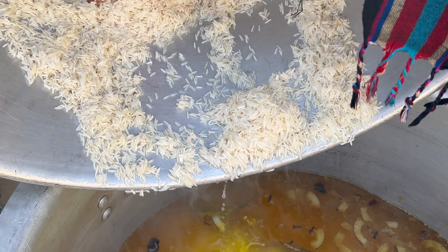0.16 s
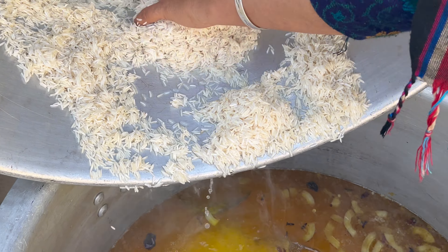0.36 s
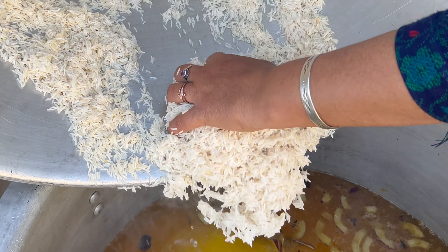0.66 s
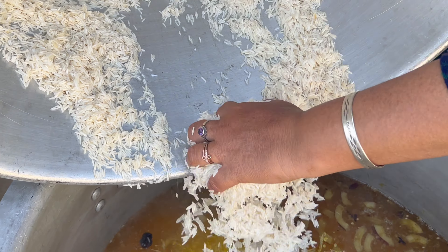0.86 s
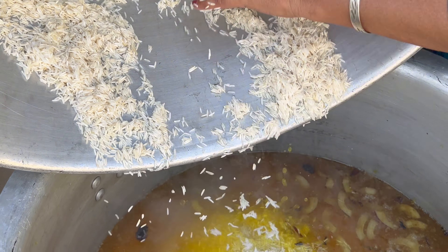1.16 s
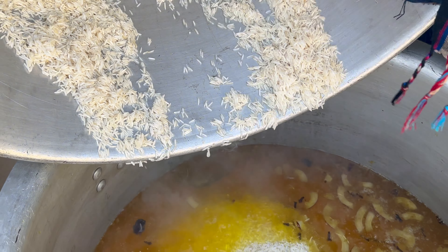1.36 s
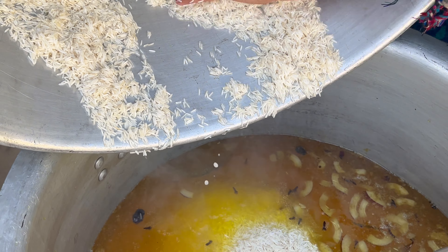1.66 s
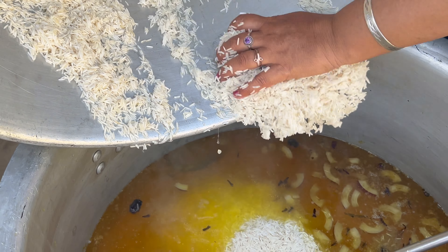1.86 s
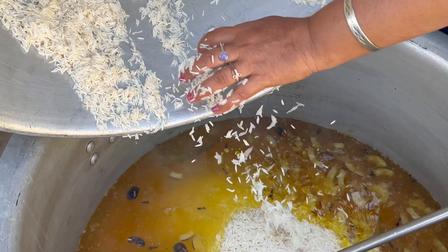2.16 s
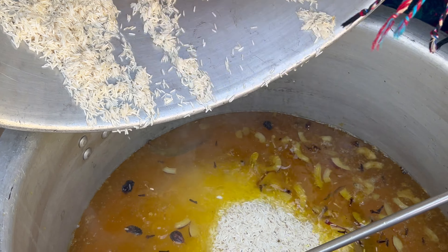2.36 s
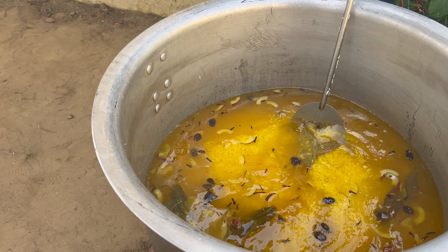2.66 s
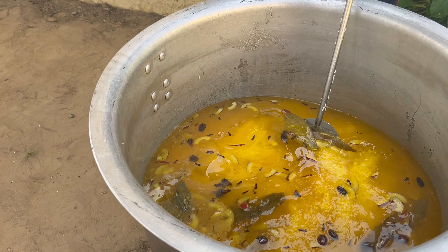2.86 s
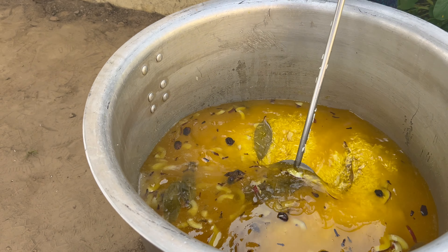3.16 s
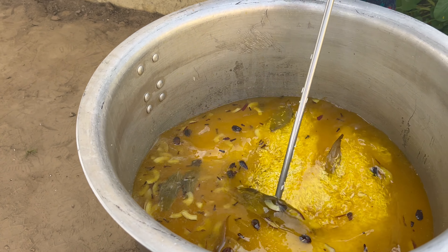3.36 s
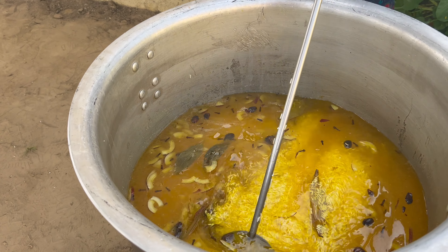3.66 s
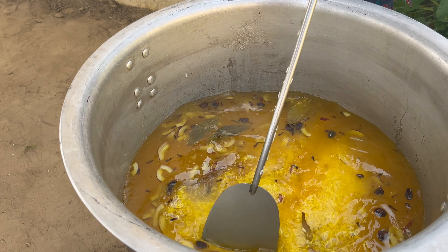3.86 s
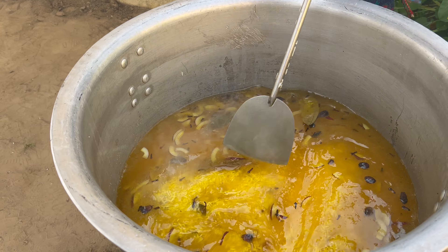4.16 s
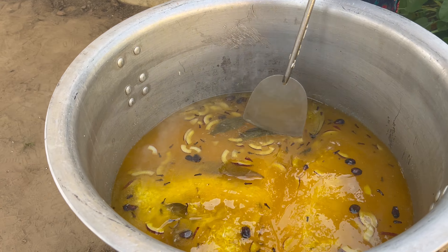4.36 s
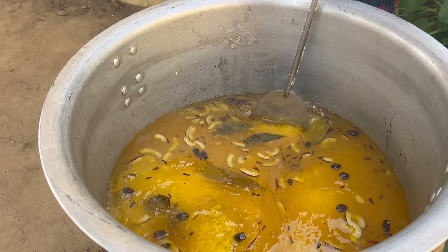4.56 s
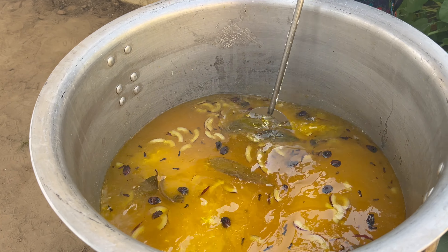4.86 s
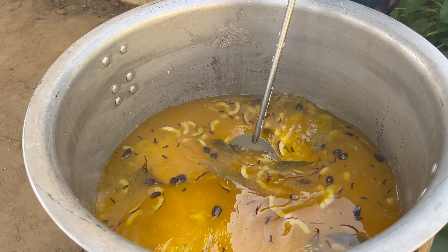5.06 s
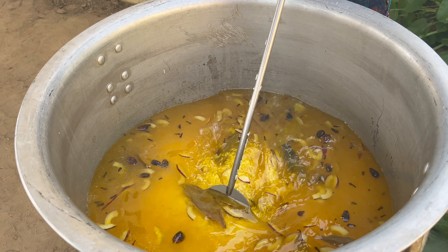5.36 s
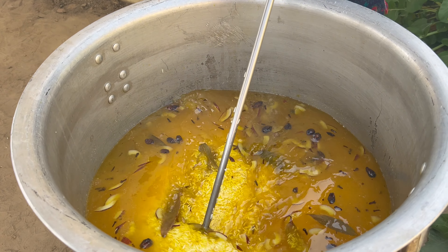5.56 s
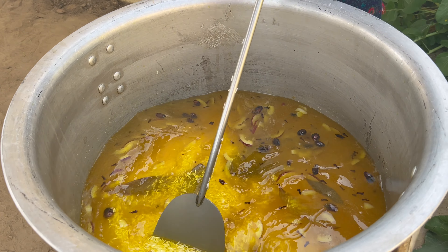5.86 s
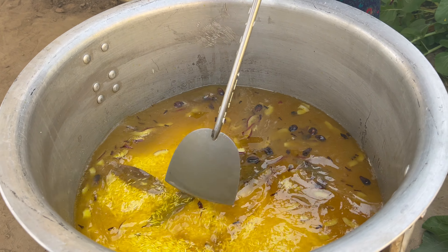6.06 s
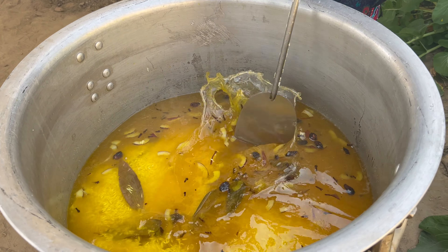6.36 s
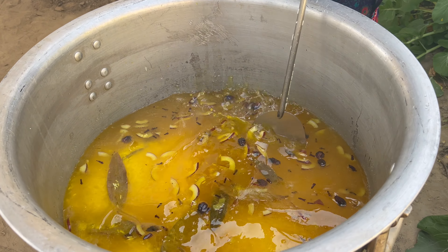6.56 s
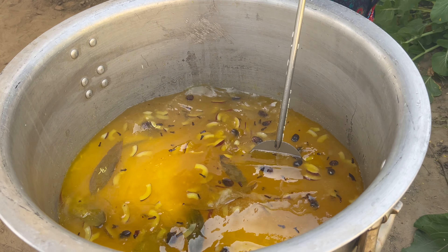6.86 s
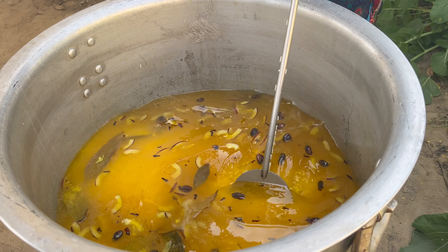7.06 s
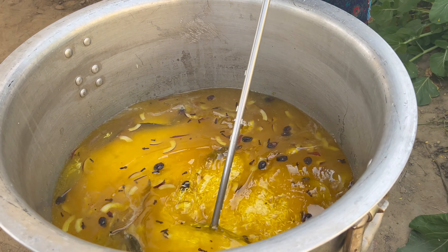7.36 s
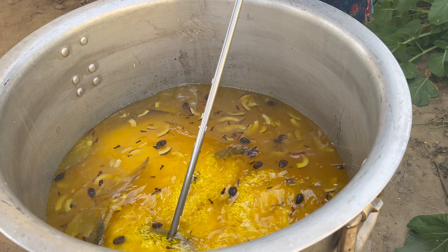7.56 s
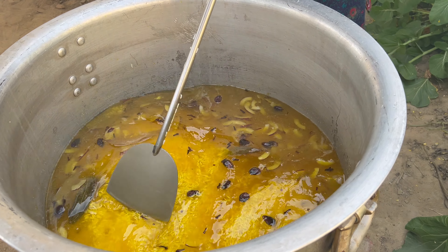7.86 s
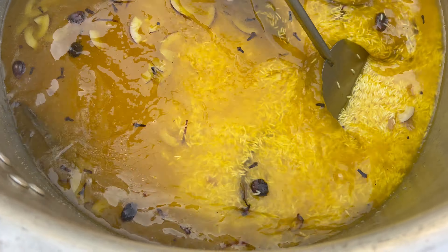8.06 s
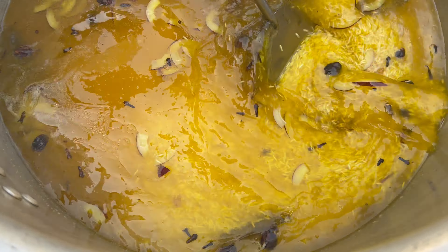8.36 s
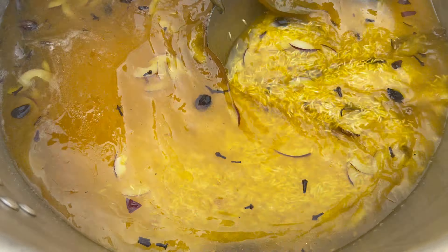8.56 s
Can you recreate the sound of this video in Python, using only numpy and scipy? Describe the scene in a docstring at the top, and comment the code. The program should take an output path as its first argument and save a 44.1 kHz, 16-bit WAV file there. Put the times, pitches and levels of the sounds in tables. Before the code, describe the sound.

Dry grains hiss over metal and fall in crisp showers into a pot of water, with quick bird whistles and wind bumps. Abruptly the pouring and birds stop. A steel ladle strikes the pot bottom with a hollow clank, crunches and scrapes wet rice, makes the pot ring, then lifts out dripping. The stroke repeats about every two seconds, and a final closer one is cut off mid-stir. Close stereo microphone, open air.

```python
"""Rice patters into a pot of hot water first, swept off a big metal tray by hand, outdoors, with bird whistles
and wind on the microphone: grains are clicks in noise, the tray a set of modes, birds gliding sines.
Then a long steel ladle stirs: it strikes the pot floor as noise bursts, grinds over it through the rice as noise
ringing in the pot, and drips as short bubble tones. The outdoor air steps in level twice, and the pouring stops
at the first step. The microphone's two ports shift the treble between the ears."""
import sys
import numpy as np
from scipy import signal
from scipy.fft import rfft, irfft, next_fast_len
from scipy.io import wavfile
from scipy.ndimage import uniform_filter1d

SR = 44100
rng = np.random.default_rng(int(sys.argv[2]) if len(sys.argv) > 2 else 0)


def generate_wav(sig):
    """Save sig (samples, or channels by samples) to the path in sys.argv[1] as 16-bit PCM at SR."""
    pcm = np.round(np.clip(np.atleast_2d(sig).T, -1, 1) * 32767).astype(np.int16)
    wavfile.write(sys.argv[1], SR, pcm)


N = 383669


def amp(db):
    """dB to gain."""
    return np.exp(np.asarray(db) * (np.log(10) / 20))


def unit(x):
    """Scale to rms 1."""
    return x / np.sqrt(np.mean(x ** 2) + 1e-20)


def in_time(rows):
    """Columns per sample, and a gate that is open between the first and last row."""
    s, *columns = np.transpose(rows)
    t = np.arange(N) / SR
    return [np.interp(t, s, c) for c in columns] + [(t >= s[0]) & (t <= s[-1])]


def in_strokes(strokes):
    """Columns per sample over all strokes, and a gate that is open during each stroke."""
    *columns, _ = in_time([row for stroke in strokes for row in stroke])
    gate = sum(in_time(stroke)[-1] for stroke in strokes)
    return columns + [gate * 1.]


def swells(s, hold_s, db, rise, fall, rest_db):
    """Level in dB: each event rises, holds and falls in straight lines (dB per s) above a resting level."""
    t = np.arange(0, N, 32)[:, None] / SR
    level = db - rise * np.maximum(s - t, 0) - fall * np.maximum(t - s - hold_s, 0)
    return np.interp(np.arange(N) / SR, t[:, 0], np.maximum(level.max(axis=1), rest_db))


def drift(rate):
    """Slow chance with spread 1: white noise through two poles at rate Hz, drawn at every 40th sample."""
    r = np.exp(-80 * np.pi * rate / SR)
    slow = signal.lfilter([1], [1, -2 * r, r * r], rng.standard_normal(N // 40 + 2002))[2000:]
    return np.interp(np.arange(N) / 40, np.arange(len(slow)), unit(slow))


def at_hz(points, hz):
    """Read a spectrum on a log frequency axis."""
    point_hz, values = np.transpose(points)
    return np.interp(np.log(hz), np.log(point_hz), values)


def band(x, low_hz, high_hz):
    """Butterworth band-pass."""
    return signal.sosfilt(signal.butter(2, [low_hz, high_hz], "band", fs=SR, output="sos"), x)


def resonate(x, hz, width_hz):
    """Two-pole resonance, gain 1 on top."""
    r = np.exp(-np.pi * width_hz / SR)
    poles = [1, -2 * r * np.cos(2 * np.pi * hz / SR), r * r]
    return signal.lfilter(np.array([1, 0, -1]) * (1 - r * r) / 2, poles, x)


def stereo(mid, side, alike):
    """Left and right with a given likeness (correlation)."""
    alike = np.clip(alike, -1, 1)
    return np.sqrt(1 + alike) * mid + np.sqrt(1 - alike) * side * [[1], [-1]]


def add(out, s, piece, pan_db=0):
    """Mix a short sound in at time s; a positive pan is louder on the left."""
    i = round(s * SR)
    piece = (piece * amp([[pan_db / 2], [-pan_db / 2]]))[:, :N - i]
    out[:, i:i + piece.shape[1]] += piece


def grains(per_s, spread_db, share):
    """Two mid-side pairs of white sources: noise with a power share of uneven clicks."""
    shape = (2, 2, N)
    sizes = amp(spread_db * np.minimum(rng.exponential(1, shape), 4))
    clicks = (rng.random(shape) < per_s / SR) * sizes * rng.choice([-1, 1], shape)
    share = np.clip(share, 0, 1)
    return np.sqrt(1 - share) * rng.standard_normal(shape) + np.sqrt(share) * unit(clicks)


def coloured(white, spectrum, alike, patchy_db, tilt_db=None):
    """Half-octave bands, each with its level, flicker and likeness; tilt_db(hz) moves bands; rms 1 before tilt."""
    bands, together = [], drift(12.8)
    edges = 15700 * 2 ** -np.arange(0, np.log2(15700 / spectrum[0][0]), .5)[::-1]
    centres = np.sqrt(edges[1:] * edges[:-1])
    for k, hz in enumerate(centres):
        mid, side = band(white[k % 2], edges[k], edges[k + 1])   # neighbouring bands take different sources
        flicker_db = patchy_db * (1.19 * together + drift(18))
        bands.append(amp(at_hz(spectrum, hz) + flicker_db) * stereo(mid, side, at_hz(alike, hz)))
    scale = np.sqrt(np.mean(sum(bands) ** 2))
    return sum(b * amp(tilt_db(hz) if tilt_db else 0) for b, hz in zip(bands, centres)) / scale


def body(x, modes, direct_db, wander_db):
    """Modes in parallel beside the direct sound; each swells and fades as the contact point moves."""
    out = amp(direct_db) * x
    for k, (hz, width_hz, db) in enumerate(modes):
        out = out + (-1) ** k * resonate(amp(db + wander_db * drift(6)) * x, hz, width_hz)
    return out


def gliding(x, hz, width_hz):
    """A resonance whose centre moves and wobbles: low noise riding on a gliding carrier, rms 1."""
    slow = signal.sosfilt(signal.butter(2, width_hz / 2, fs=SR, output="sos"), x)
    wobble = 1 + .025 * drift(8)
    phase = 2 * np.pi * np.cumsum(hz * wobble) / SR
    flicker = amp(4 * drift(10))
    return unit((slow[0] * np.cos(phase) + slow[1] * np.sin(phase)) * flicker)


def gurgle(per_s, low_hz, high_hz, sharpness):
    """Bubbles at random moments and sixteen pitches, swelling softly and ringing some cycles; rms 1."""
    born = (rng.random(N) < per_s / SR) * amp(2.3 * np.minimum(rng.exponential(1, N), 3))
    dealt, pans_db = rng.integers(0, 16, N), rng.normal(0, 3, 16)
    out = 0
    for k, hz in enumerate(np.geomspace(low_hz, high_hz, 16)):
        struck = born * (dealt == k) + 1e-18
        ring = resonate(resonate(struck, hz, hz / sharpness), hz, hz / 5)
        out = out + ring * amp([[pans_db[k]], [-pans_db[k]]]) / hz
    return unit(out)


# The stirred water fizzes. Each row: start in seconds, hold in seconds, gain in dB.
CHURN = [(3.3, 0.25, -54), (5.015, 0.51, -60.5), (6.412, 0.93, -61), (8.209, 0.44, -55)]
CHURN_RISE_DB_PER_S, CHURN_REST_DB = 35, -68


def churn_db():
    """Level of the fizz that each stroke stirs up."""
    return swells(*np.transpose(CHURN), CHURN_RISE_DB_PER_S, fall=60, rest_db=CHURN_REST_DB)


# Outdoor air. Each row: frequency in Hz, density in dB per Hz.
AIR = [(59, -41.5), (100, -2), (140, -5.5), (177, -13.5), (589, -17), (1210, -19), (2520, -25.5),
       (7890, -36), (10200, -29), (12800, -35.5), (15500, -32.5)]
# Likeness of the ears in the open. Each row: frequency in Hz, correlation.
OPEN_ALIKE = [(60, 0.34), (240, 0.15), (950, 0.081), (3770, 0.035), (9000, 0.55), (15000, 1)]
# Moments in seconds at which the air steps in level.
AIR_STEPS_S = (2.432, 8.0)
# Gain of the air in dB before, between and after those steps.
AIR_DB = (-48.5, -65, -51.5)


def air():
    """Quiet outdoor noise; the water's murmur lifts it during a stroke and dies slowly after."""
    s, hold_s, _ = np.transpose(CHURN)
    settle_db = swells(s, hold_s, -56, CHURN_RISE_DB_PER_S, fall=7, rest_db=-120)
    air_db = np.take(AIR_DB, np.searchsorted(AIR_STEPS_S, np.arange(N) / SR))
    noise = coloured(rng.standard_normal((2, 2, N)), AIR, OPEN_ALIKE, patchy_db=1.0)
    return amp(np.maximum(air_db, settle_db)) * noise


# Gusts at the microphone. Each row: start in seconds, hold in seconds, thump gain in dB, flutter gain in dB.
GUSTS = [(0.208, 0.037, -34, -38), (0.386, 0.14, -35, -56), (0.644, 0.015, -35.5, -68),
         (0.983, 0.062, -33, -73), (1.127, 0.31, -48.5, -56.5), (2.452, 0.017, -39.5, -51.5),
         (2.698, 0.013, -39.5, -36), (2.79, 0.077, -42.5, -47), (3.12, 0.02, -49, -62),
         (3.702, 0.014, -35.5, -64), (3.783, 0.008, -43.5, -66), (4.071, 0.038, -50.5, -65),
         (4.174, 0.062, -44, -72.5), (4.272, 0.0086, -32.5, -49), (4.627, 0.013, -45, -50),
         (5.319, 0.11, -38, -34.5), (5.523, 0.017, -39, -44), (5.6, 0.034, -34.5, -47),
         (5.699, 0.0098, -33.5, -43), (6.178, 0.02, -40.5, -44), (6.32, 0.018, -35.5, -42),
         (6.926, 0.053, -44, -43), (7.151, 0.023, -59, -37.5), (8.004, 0.11, -45.5, -50),
         (8.189, 0.0081, -32, -45), (8.437, 0.15, -49, -70)]


def wind():
    """Lumpy low noise on the microphone ports: a deep thump and a flutter above it."""
    s, hold_s, thump_db, flutter_db = np.transpose(GUSTS)
    mid, side = rng.standard_normal((2, 2, N))
    thump = unit(band(band(stereo(mid[0], side[0], 0.35), 44.8, 84.3), 30, 190))
    flutter = unit(band(band(stereo(mid[1], side[1], 0.93), 68, 220), 70, 420))
    slopes = 352, 362.5   # rise and fall, dB per s
    thump_level = amp(swells(s, hold_s, thump_db, *slopes, rest_db=-59))
    flutter_level = amp(swells(s, hold_s, flutter_db, *slopes, rest_db=-69))
    return thump_level * thump + flutter_level * flutter


# Bird notes, one list a note. Each row: time in seconds, pitch in Hz, gain in dB.
BIRDS = [
    [(0.13, 2750, -48), (0.15, 3500, -48), (0.16, 3600, -49), (0.175, 3620, -52)],
    [(0.18, 3300, -52), (0.192, 2750, -48), (0.203, 2550, -48)],
    [(0.385, 3100, -53), (0.401, 3140, -41.5), (0.42, 3460, -34.5), (0.434, 3560, -42), (0.443, 4040, -23)],
    [(0.445, 3200, -50), (0.456, 2700, -47), (0.466, 2550, -48)],
    [(0.464, 4150, -48), (0.472, 3500, -39), (0.497, 3250, -36.5), (0.53, 3234, -44), (0.575, 3220, -56)],
    [(0.637, 9700, -54), (0.65, 8800, -52), (0.66, 6300, -52)],
    [(0.678, 5950, -52), (0.69, 5750, -51), (0.707, 4400, -53)],
    [(0.705, 2800, -57), (0.714, 3500, -57), (0.73, 3950, -59)],
    [(0.72, 2750, -48), (0.73, 3020, -40), (0.758, 3010, -31), (0.783, 2980, -41)],
    [(0.797, 2650, -42), (0.82, 2900, -30), (0.838, 3000, -27), (0.852, 3000, -28)],
    [(0.862, 2550, -37), (0.878, 3000, -34), (0.897, 2550, -35)],
    [(1.955, 3100, -46), (1.978, 4050, -47), (2.028, 4560, -44), (2.155, 4615, -42.5)],
    [(2.326, 5000, -52), (2.339, 8000, -48)],
    [(2.352, 5800, -48), (2.366, 8200, -50)],
    [(2.38, 6960, -46), (2.406, 7700, -48), (2.432, 7230, -53)],
]
# Echoes of each note. Each row: delay in seconds, gain in dB, left over right in dB.
BIRD_ECHOES = [(.0022, -14, -12), (.017, -16, 6)]


def birds():
    """Near-sine whistles with a weak octave and a few short echoes."""
    out = np.zeros((2, N))
    for note in BIRDS:
        s, hz, db = np.transpose(note)
        t = np.arange(s[0], s[-1], 1 / SR)
        phase = 2 * np.pi * np.cumsum(np.interp(t, s, hz)) / SR
        fade = np.clip(np.minimum(t - s[0], s[-1] - t) / .006, 0, 1)
        rough = amp(1.5 * unit(uniform_filter1d(rng.standard_normal(len(t)), size=500)))   # fast unevenness
        whistle = rough * np.sin(phase) + amp(-30) * np.sin(2 * phase)
        tone = np.sqrt(2) * fade * amp(np.interp(t, s, db)) * whistle
        add(out, s[0], tone, pan_db=6)
        for delay_s, echo_db, pan_db in BIRD_ECHOES:
            add(out, s[0] + delay_s, amp(echo_db) * tone, pan_db)
    return out


# The hand sweeps along the tray. Each row: start in seconds, hold in seconds, gain in dB.
SWEEPS = [(0.136, 0.033, -46.5), (0.27, 0.054, -41.5), (1.03, 0.014, -51), (1.632, 0.057, -46),
          (1.728, 0.13, -40), (1.935, 0.17, -46.5)]
HAND_REST_DB = -56


def sweep_db():
    """Level of the hand's rubbing."""
    return swells(*np.transpose(SWEEPS), rise=101, fall=134, rest_db=HAND_REST_DB)


# Rice rubbed along metal. Each row: frequency in Hz, density in dB per Hz.
RUB = [(88, -17), (150, -2), (240, -16), (413, -4), (530, -2.5), (1170, -1), (1840, -2), (2580, -2.5),
       (5000, -16.5), (6500, -25), (11000, -120)]
# Modes of the tray. Each row: frequency in Hz, width in Hz, gain in dB.
TRAY = [(436, 46, 1.5), (705, 150, -1.5), (1190, 100, 1.5), (2010, 40, -3), (2530, 170, -1.5)]


def rub():
    """The hand rubs rice along the tray: grainy noise ringing in the metal's modes."""
    contact = coloured(grains(500, 3.5, .55), RUB, OPEN_ALIKE, patchy_db=1.2)
    return amp(sweep_db()) * body(contact, TRAY, direct_db=2.0, wander_db=3)


# The tray booms. Each row: start in seconds, hold in seconds, gain in dB.
BOOMS = [(0.214, 0.019, -26), (0.283, 0.034, -29.5), (1.637, 0.16, -37), (2.016, 0.01, -43)]


def boom():
    """The tray's boom: noise through two low resonances in series, the same in both ears."""
    boom_db = swells(*np.transpose(BOOMS), rise=716, fall=121, rest_db=-56)
    mid, side = resonate(resonate(rng.standard_normal((2, N)), 106.8, 15.7), 74.0, 27)
    return amp(boom_db) * unit(stereo(mid, side, 1.0))


# Handfuls of rice falling. Each row: start in seconds, hold in seconds, gain in dB.
SHOWERS = [(0.789, 0.29, -29.5), (1.136, 0.098, -34.5), (2.018, 0.15, -32), (2.07, 0.045, -29.5),
           (2.198, 0.098, -39.5)]
# Patter of grains on water. Each row: frequency in Hz, density in dB per Hz.
SHOWER = [(530, -54), (900, -3.5), (991, -24), (1340, -31), (2160, -1), (4180, -2.5), (7510, -3.5),
          (10000, 0.5), (13000, -3), (14900, -14.5), (15800, -25)]


def shower():
    """Grains patter into the water: handfuls land at once and thin out over a trickle that follows the hand."""
    trickle_db = -43.5 + 0.23 * (sweep_db() - HAND_REST_DB)
    fall_db = swells(*np.transpose(SHOWERS), rise=901, fall=140, rest_db=-120)
    patter = coloured(grains(500, 4.5, 0.55), SHOWER, OPEN_ALIKE, patchy_db=2.5)
    return amp(np.maximum(fall_db, trickle_db)) * patter


def pour():
    """Patter, rubbing and booming tray together, until the first step of the air."""
    on = np.arange(N) < AIR_STEPS_S[0] * SR
    return on * (shower() + rub() + boom())


# The loudest grains and droplets snapping. Each row: time in seconds, gain in dB, pitch in Hz, left over right in dB.
TICKS = [(0.124, -25.5, 6460, -0.5), (0.2247, -22, 6120, 0.5), (0.789, -14.5, 4770, 1),
         (0.872, -20.5, 4600, 15), (0.9131, -17, 4200, 4), (1.024, -22.5, 4300, -10),
         (1.073, -26, 3870, -8), (1.1286, -17, 4130, -0.5), (1.289, -22, 13100, -2),
         (1.389, -24, 13300, 0.0), (1.7032, -30, 3660, 7), (2.0016, -12, 13500, 1), (2.0592, -24, 4450, 21),
         (2.117, -19, 4540, 16), (2.287, -32.5, 3600, -10), (2.337, -19.5, 11300, -4),
         (3.807, -43.5, 8200, 0), (3.982, -47, 5660, 0), (4.053, -45, 6300, -3), (4.064, -43, 8500, 3),
         (5.183, -26.5, 11900, 0), (5.206, -29, 11100, 0), (5.452, -34, 9000, -5), (5.782, -44, 8160, -0.5),
         (5.892, -41, 12450, 1), (6.064, -41.5, 6220, 1), (6.108, -46, 6070, -2), (6.214, -30, 9400, 1),
         (6.249, -41, 5160, 24), (6.375, -46, 5410, 10), (6.5775, -31.5, 3630, -1), (6.631, -24, 6660, -1),
         (7.1254, -38, 3650, -1), (7.444, -28, 14400, -2), (7.619, -35.5, 11600, -1), (8.284, -26, 4760, 3),
         (8.311, -28, 4670, 2), (8.353, -32, 4520, -1), (8.4545, -18, 6080, -4), (8.496, -30, 12700, -4),
         (8.539, -27.5, 5910, 1), (8.5788, -35, 11770, -2)]


def droplets():
    """Small snaps at random moments, kept only where the water fizzes; rows as in TICKS."""
    fizz_db, rows = churn_db(), []
    for u, v, p, q in rng.random((90, 4)):
        db = fizz_db[int(u * N)]
        if db > CHURN_REST_DB + 2:
            rows.append((u * N / SR, db + 12 + 9 * v, 4900 * 2 ** (1.1 * p ** 3), 12 * q - 6))
    return rows


def ticks():
    """Each is a click that rings a few cycles over a wide band."""
    out, t = np.zeros((2, N)), np.arange(SR // 50) / SR
    for s, db, hz, pan_db in TICKS + droplets():
        noise = stereo(*rng.standard_normal((2, len(t))), 0.46) * amp(-5.0 - 60 * t / 0.042)
        ring = np.sin(2 * np.pi * hz * t) * amp(-60 * t * hz / 14)   # 60 dB down after 14 cycles
        add(out, s, amp(db) * (ring + .5 * band(noise, 0.66 * hz, 17000)), pan_db)
    return out


# Clumps and drops swallowed by the water. Each row: time in seconds, gain in dB, nominal bubble pitch in Hz.
PLOPS = [(0.988, -32.5, 1000), (1.026, -28, 2200), (1.055, -33.5, 723), (1.121, -28.5, 2980),
         (1.271, -32.5, 702), (1.526, -39.5, 740), (1.535, -37, 2840), (1.545, -35, 3230),
         (1.71, -30.5, 3600), (1.8086, -30.5, 3730), (1.863, -28, 4000), (2.095, -27, 1940),
         (2.108, -26, 1970), (2.16, -31, 6600), (2.3376, -34, 2710), (2.862, -30, 694), (2.925, -36, 694),
         (3.078, -42.5, 3600), (3.155, -37, 2700), (3.458, -43, 3720), (3.535, -35, 801),
         (3.566, -33, 1700), (3.665, -49, 2400), (3.665, -47, 3800), (3.686, -42.5, 826),
         (4.572, -26, 2020), (4.66, -31.5, 628), (4.686, -40, 1800), (5.69, -49.5, 3170),
         (6.059, -34.5, 2155), (6.588, -25.5, 753), (6.619, -28, 1900), (7.134, -40.5, 3110),
         (7.49, -39, 2630), (7.56, -45, 1910), (7.585, -44, 854), (7.6036, -46.5, 2930), (7.695, -47, 3790),
         (8.161, -47, 1130), (8.198, -32, 2455), (8.23, -49, 700), (8.284, -42, 2560), (8.351, -38.5, 2630),
         (8.42, -38, 3530), (8.459, -39, 785), (8.546, -26.5, 1075), (8.545, -26.5, 1714),
         (8.607, -35, 795), (8.613, -25, 1048)]


def swirls():
    """Bubbles swallowed at random moments of louder grinding; rows as in PLOPS."""
    grind_rows = np.array([row for stroke in STIR for row in stroke])[:, :2]
    rows = []
    for s, v, p in rng.random((70, 3)) * [N / SR, 1, 1]:
        grind_db = np.interp(s, *grind_rows.T)
        if grind_db > -50 and s > STIR[0][1][0]:
            rows.append((s, grind_db + 2 + 8 * v, 800 * 3 ** p))
    return rows


def plops():
    """A trapped bubble rings and rises in pitch inside a short splash; big clumps leave a dull wash."""
    out, t = np.zeros((2, N)), np.arange(SR // 6) / SR
    for s, db, hz in PLOPS + swirls():
        noise = rng.standard_normal((2, 2, len(t)))
        bubble = np.sin(2 * np.pi * hz * t * (.96 + 3.0 * t))
        splash = 2.0 * band(noise[0], .7 * hz, 1.4 * hz)
        wash_db = 13 - 35 * np.log2(hz / 700) - 60 * t / 0.26   # low bubbles come with more wash
        wash = amp(wash_db) * band(noise[1], 250, 700)
        decay = amp(-60 * t / (0.019 + 42 / hz))
        onset = 1 - np.exp(-t / 0.00077)
        add(out, s, amp(db) * onset * (decay * (bubble + splash) + wash))
    return out


# Spray, one list a stroke. Each row: time in seconds, gain in dB.
SPRAY = [
    [(2.76, -65), (2.89, -54.5), (3.03, -63), (3.25, -57), (3.4, -56), (3.55, -62), (3.7, -73)],
    [(4.72, -62), (4.85, -48.5), (5.1, -58), (5.3, -58), (5.5, -59), (5.68, -81)],
    [(6.56, -63), (6.64, -55), (6.78, -72), (7.05, -67.5), (7.4, -60), (7.56, -62)],
    [(8.0, -62.5), (8.55, -53), (8.7, -64)],
]


def spray():
    """Dense small bright bubbles thrown up by each stroke in bursts."""
    db, gate = in_strokes(SPRAY)
    on = uniform_filter1d(gate, size=1800)
    return on * amp(db + 2 * drift(6)) * gurgle(2000, 1900, 6000, sharpness=90)


# The lifted ladle touches the wall. Each row: time in seconds, gain in dB, share of the free ring time,
# brightness in dB per octave.
TAPS = [(6.064, -53, 0.18, 19), (6.226, -41, 1.3, -3.5), (6.25, -38.5, 0.84, 6), (6.305, -58.5, 1.2, 15)]
# Modes of the ladle in air. Each row: starting frequency in Hz, gain in dB, free ring time t60 in seconds.
LADLE = [(613, -7.5, 3.6), (736, -4.5, 0.2), (897, -1, 0.097), (1150, -14, 0.2), (1420, -9, 0.2),
         (1850, -18, 0.06), (2120, -11, 0.078), (3140, -32.5, 0.3)]


def taps():
    """Out of the water the ladle rings freely; every touch strikes its modes a little differently."""
    out, t = np.zeros((2, N)), np.arange(SR // 4) / SR
    for s, db, ring_share, bright_db in TAPS:
        ring = 0
        for hz, mode_db, t60 in LADLE:
            decay_db = -60 * t / (ring_share * min(t60, .45))
            tone = np.sin(2 * np.pi * hz * t * (1 - 0.25 * t))   # pitch sinks at half its start per second
            ring = ring + amp(mode_db + bright_db * np.log2(hz / 1000) + decay_db) * tone
        scuff = band(rng.standard_normal((2, len(t))) * amp(-60 * t / .06), 1200, 7000)
        waver = amp(4 * unit(uniform_filter1d(rng.standard_normal(len(t)), size=400)))
        onset = 1 - np.exp(-t / 0.003)
        add(out, s, amp(db) * onset * (waver * ring + amp(6.0) * scuff))
    return out


# Ladle on the pot. Each row: time in seconds, gain in dB, thud gain over it in dB, clank gain over it in dB,
# rattle t60 in seconds (played no shorter than 0.02).
BLOWS = [(2.667, -9.5, 10.5, -2.5, 0.17), (2.891, -27.5, -4, 2.5, 0.23), (4.572, -34, -12, 6, 0.087),
         (4.583, -18.5, 2, -7, 0.12), (4.592, -5.5, 2.5, -1.5, 0.095), (4.614, -12, 4.5, -6.5, 0.16),
         (4.904, -31.5, -1, 7, 0.11), (4.985, -42, 29, -7.5, 0.37), (6.468, -2, 6, -6.5, 0.22),
         (6.6, -31, -1, -6, 0.062), (6.612, -24.5, 2, -6, 0.095), (6.658, -39, 3, -5, 0.075),
         (6.679, -26, 11, -11, 0.084), (6.699, -32, -2, 2, 0.073), (6.71, -28.5, 14.5, -3, 0.13),
         (6.827, -45, -5, -1, 0.053), (6.846, -43, -7, 1.5, 0.053), (7.024, -40.5, 20.5, 5, 0.052),
         (8.532, -30.5, -10, -5.5, 0.15), (8.546, -31, -4, -15, 0.51)]
# The struck blade. Each row: frequency in Hz, gain over the clank in dB, t60 in seconds.
BLADE_CLANG = [(1410, 1.5, 0.025), (2760, 3.5, 0.0065)]
# Modes of the pot, struck and ground. Each row: frequency in Hz, width in Hz, gain in dB.
POT = [(164.9, 11, 0.5), (215.7, 28.6, 4), (285, 260, -4.5), (353, 50, -9), (455.6, 9.5, -2.5),
       (483.3, 14, 1), (558.7, 10, -9.5), (751, 55, -1), (829.4, 8.2, -3.5), (940, 22, -3.5),
       (1087, 4.7, -1.5), (1123, 8.6, -5.5), (1410, 14, -5.5), (1390, 70, 1), (1472, 85, -5.5),
       (1675, 16, -2.5), (2010, 13, -20.5), (2213, 14, -6.5), (2586, 30, -15.5), (2648, 114, -12),
       (3090, 31, -18), (3470, 35, -23.5), (4120, 60, -18)]


def blows():
    """A sharp crack, then a rattle that dies away; both ring through the pot, and the blade clangs."""
    out, t = np.zeros((2, N)), np.arange(SR // 3) / SR
    clangs = np.zeros((2, N))
    onset = 1 - np.exp(-t / 0.00036)   # the contact takes time to build
    push = np.exp(-t / 0.00037)   # the dull shove of the blade on the floor
    for s, db, thud_db, clank_db, t60 in BLOWS:
        noise = rng.standard_normal((2, len(t)))
        crack, rattle = amp(-60 * t / 0.0074), amp(-12.5 - 60 * t / max(t60, .02))
        mid, side = noise * onset * (crack + rattle)
        thud = stereo(band(mid + 2.66 * push, 170, 570), band(side, 140, 600), 0.2) * amp([[1.1], [-1.1]])
        knock = band(stereo(mid, side, 0.05), 450, 2830)
        hiss = band(stereo(*noise, 0.84) * amp(-60 * t / 0.016), 6600, 20000)
        clank = band(stereo(mid, side, 0.19), 2400, 2800) + amp(-8.0) * hiss
        clang = sum(amp(g - 60 * t / ring_s) * np.sin(2 * np.pi * hz * t) for hz, g, ring_s in BLADE_CLANG)
        add(clangs, s, amp(db + clank_db) * onset * clang)
        add(out, s, amp(db) * (amp(thud_db) * thud + amp(13.0) * knock + amp(clank_db) * clank))
    inaudible = 1e-12 * np.sin(np.arange(N))   # keeps the filters off vanishing numbers
    return clangs + body(out + inaudible, POT, direct_db=-6.0, wander_db=6.5)


# The pot's moving rings, one list a stroke. Each row: time in seconds, low ring in Hz, its level in dB,
# high ring in Hz, its level in dB; both are played 10.5 dB lower.
RINGS = [
    [(2.72, 468, -30, 2110, -54), (2.762, 502, -35, 1920, -62), (2.902, 484, -28, 2080, -49),
     (3.128, 478, -40.5, 1940, -55), (3.562, 528, -44, 2040, -38.5), (3.598, 534, -35, 1950, -69),
     (3.7, 543, -73, 2020, -64)],
    [(4.62, 484, -18, 1900, -39), (4.666, 500, -24.5, 1990, -52), (4.722, 505, -39.5, 2220, -65),
     (4.832, 500, -32, 1960, -26), (5.144, 495, -28.5, 1970, -59), (5.422, 552, -60, 2100, -39.5),
     (5.582, 526, -37, 1990, -41), (5.68, 490, -43.5, 1850, -68)],
    [(6.52, 498, -19, 2120, -32), (6.572, 479, -31.5, 2130, -54), (6.618, 511, -34, 2170, -32.5),
     (6.814, 459, -38.5, 2010, -47), (7.172, 538, -37.5, 2090, -56), (7.286, 494, -58, 2110, -48),
     (7.454, 530, -49, 1960, -61.5), (7.62, 518, -81, 1890, -63)],
    [(8.0, 487, -51, 2080, -52.5), (8.074, 552, -52.5, 2030, -46.5), (8.364, 491, -46, 1940, -47),
     (8.464, 518, -35, 2050, -54), (8.498, 526, -58, 2030, -63), (8.552, 536, -44, 1820, -35),
     (8.7, 487, -62, 2180, -63)],
]


def rings():
    """The pot sings under the grinding edge: noise in two resonances that move with the contact point."""
    low_hz, low_db, high_hz, high_db, gate = in_strokes(RINGS)
    out = 0
    for hz, db, alike in (low_hz, low_db, .8), (high_hz, high_db, .45):
        mid, side = (gliding(rng.standard_normal((2, N)), hz, width_hz=65) for ear in "ms")
        out = out + amp(db - 10.5) * stereo(mid, side, alike)
    return uniform_filter1d(gate, size=900) * out


# Rice crunched on the pot floor. Each row: frequency in Hz, density in dB per Hz.
GRIND = [(71, -16.5), (120, -17.5), (234, -1), (403, -24), (491, -4.5), (537, -8.5), (976, -9), (1430, -8),
         (1560, -12.5), (2010, -11.5), (9000, -32.5), (11700, -87.5)]
# Likeness of the ears at the pot. Each row: frequency in Hz, correlation.
POT_ALIKE = [(60, 0.8), (180, 1), (550, 0.7), (1650, 0.17), (4970, 0.11), (9000, .7), (15000, .8)]
# Fizz of stirred water. Each row: frequency in Hz, density in dB per Hz.
FIZZ = [(3000, -16.5), (5000, -23.5), (8000, 5.5), (11500, -4.5), (14500, -9), (15600, -6)]
# Strokes, one list each; the first three from the blade entering the water, the fourth already under way at 8.0
# s. Each row: time in seconds, grinding level in dB, # pot floor drone level in dB, blade note in Hz, blade
# note over the grinding in dB.
STIR = [
    [(2.6, -58, -62, 1384, -34), (2.66, -50, -65.5, 1410, 1), (2.7, -54, -29, 836, -12),
     (2.834, -35.5, -37.5, 1223, -38), (2.924, -36.5, -30, 1002, -15), (3.106, -47, -32.5, 1355, -6.5),
     (3.3, -37.5, -36.5, 1318, -11), (3.366, -40, -47.5, 1038, 2), (3.46, -38.5, -55, 1033, -4),
     (3.51, -36, -47.5, 756, -7), (3.686, -56.5, -61, 792, 4), (3.85, -86.5, -104, 1025, -19)],
    [(4.52, -65, -78, 1320, -24), (4.575, -49.5, -85, 1420, -16), (4.66, -42.5, -36.5, 1438, -6),
     (4.742, -41, -39, 1340, -35), (4.84, -31.5, -41, 1390, -11), (5.022, -35, -34, 1394, -11.5),
     (5.18, -39.5, -28, 1410, -11), (5.35, -32.5, -44.5, 1466, -8), (5.434, -38, -54, 1237, -11),
     (5.6, -40, -46, 1398, -1), (5.8, -80, -87, 835, -28)],
    [(6.44, -59, -97, 1346, -11), (6.468, -27, -27, 1380, -13), (6.53, -44.5, -21.5, 1425, -4),
     (6.628, -28, -18.5, 1429, -12), (6.762, -40, -32.5, 1428, -17), (6.824, -37, -41.5, 1384, 0.5),
     (6.994, -42, -33, 1420, -17), (7.272, -41, -45, 1355, -4), (7.42, -42.5, -57.5, 1364, -11),
     (7.49, -46.5, -43.5, 987, -16), (7.574, -58, -70, 913, -8), (7.716, -72, -69, 907, -2.5),
     (7.99, -102.5, -55, 1112, -16.5)],
    [(8.0, -45, -47.5, 1088, 0), (8.178, -46.5, -53.5, 1118, -0.5), (8.41, -40, -40, 974, -23),
     (8.634, -39, -38, 1120, -7), (8.7, -47, -41, 970, -10)],
]


def stir():
    """The ladle edge crunches rice against the pot floor, its blade sings, the water gurgles and fizzes."""
    grind_db, drone_db, blade_hz, blade_db, gate = in_strokes(STIR)
    grit_db = -46.5 + 0.74 * (grind_db + 42.5) - 0.18 * (drone_db + 43.0)

    def level_db(hz):
        """Drone in the bass, grinding in the middle, grit in the treble."""
        return drone_db if hz < 330 else grit_db if hz > 2500 else grind_db

    contact = coloured(grains(600, 2.7, 0.38), GRIND, POT_ALIKE, 1.51, level_db)
    mid, side = (gliding(rng.standard_normal((2, N)), blade_hz, width_hz=70) for ear in "ms")
    blade = amp(blade_db) * stereo(mid, side, 0.18)
    water = amp(-12.0) * gurgle(200, 500, 2600, sharpness=40)
    grind = amp(5.5) * body(contact, POT, direct_db=-9.0, wander_db=5.0) + amp(grind_db) * (blade + water)
    fizz = amp(churn_db()) * coloured(grains(150, 5.5, 0.7), FIZZ, OPEN_ALIKE, patchy_db=3.5)
    return uniform_filter1d(gate, size=200) * (grind * amp([[.7], [-.7]]) + fizz)


def scene():
    """All sources, from the outdoor air up to the stirring ladle."""
    background = air() + wind() + birds()
    rice_and_water = pour() + ticks() + plops() + spray()
    return background + rice_and_water + taps() + blows() + rings() + stir()


# Phase between the microphone's ports. Each row: frequency in Hz, lead of the left in radians.
PORT_PHASE = [(0, 0), (7300, 0), (8900, -3.1), (10300, -3.3), (11900, -6.0), (13700, -6.5), (15200, -9.3),
              (22050, -9.5)]


def record(dry):
    """Two close ports turn the treble's phase and dip it; peaks are rounded, the top is cut."""
    size = next_fast_len(N + 512)
    turn = np.interp(np.arange(size // 2 + 1) * SR / size, *np.transpose(PORT_PHASE))
    right = irfft(rfft(dry[1], size) * np.exp(-1j * turn), size)[:N]
    ported = np.array([dry[0], right])
    heard = ported - 0.52 * resonate(ported, 9250, width_hz=9600)
    top_cut = signal.cheby2(12, 70, 16489, fs=SR, output="sos")
    return signal.sosfilt(top_cut, np.tanh(heard))


dry = scene()
out = record(dry)
generate_wav(out)
```